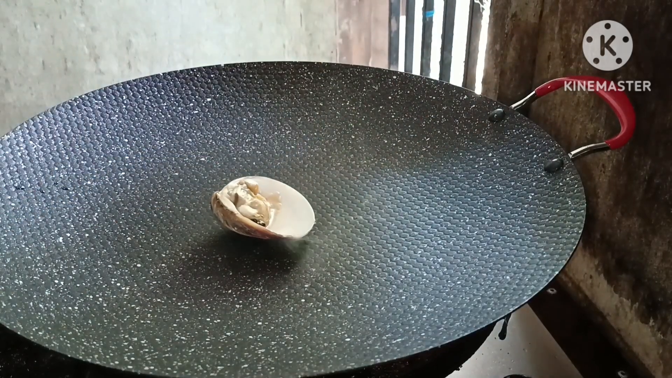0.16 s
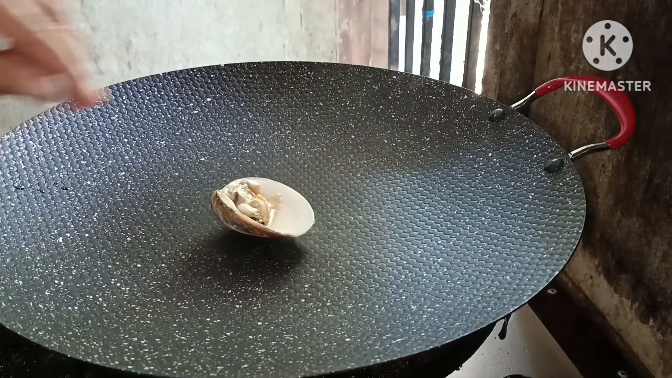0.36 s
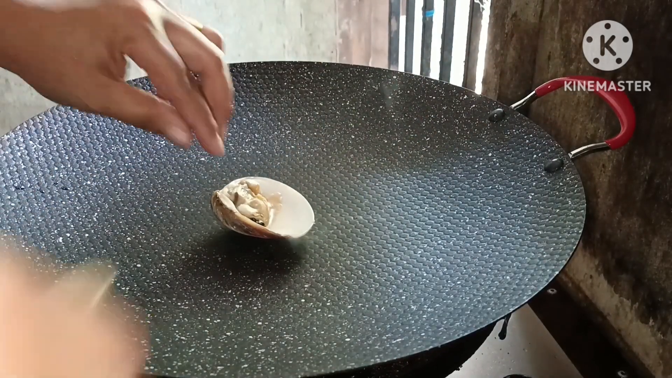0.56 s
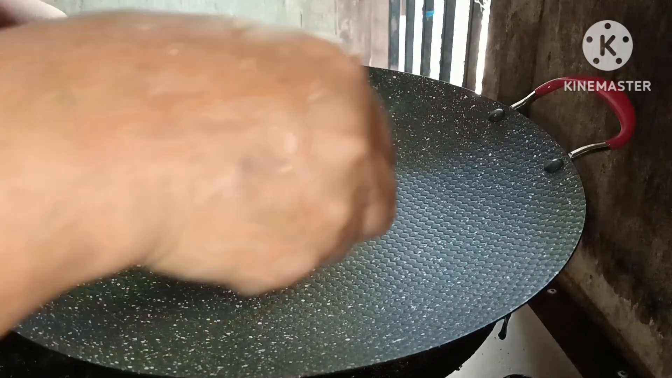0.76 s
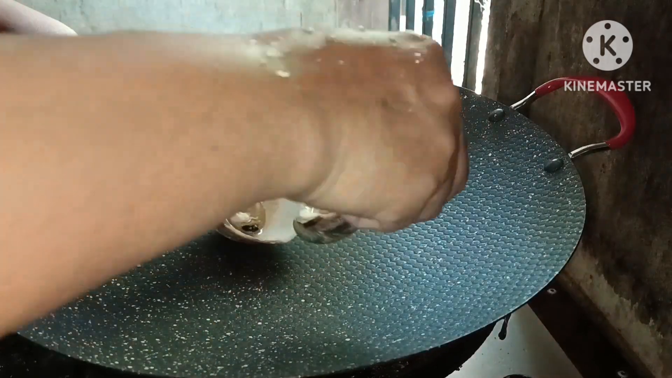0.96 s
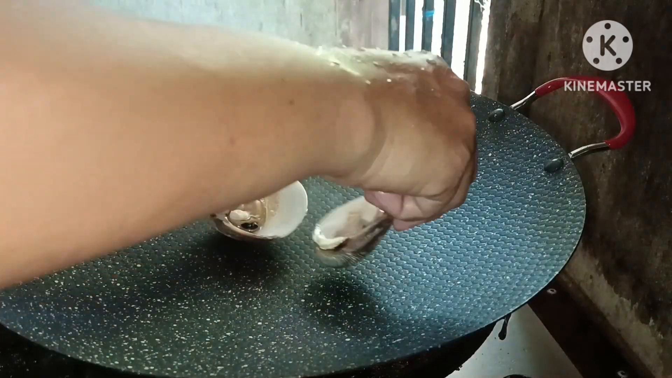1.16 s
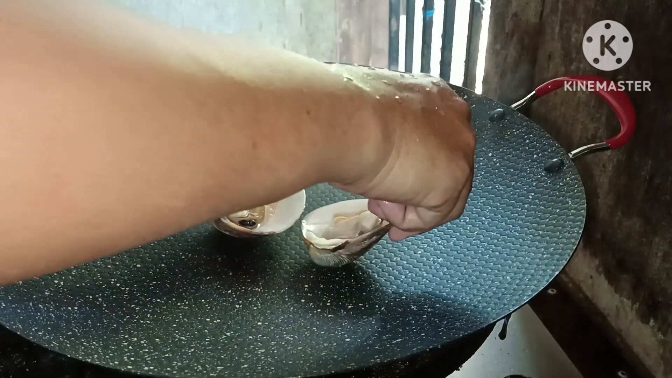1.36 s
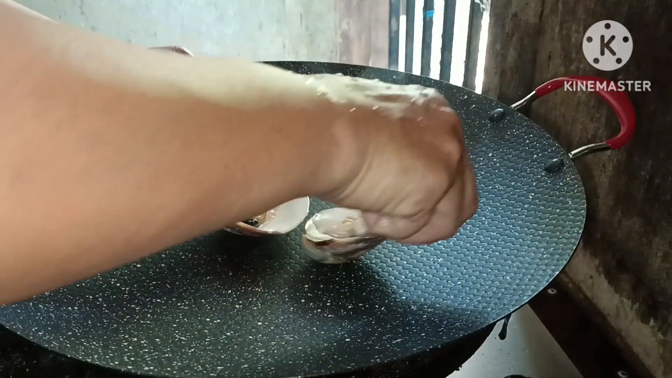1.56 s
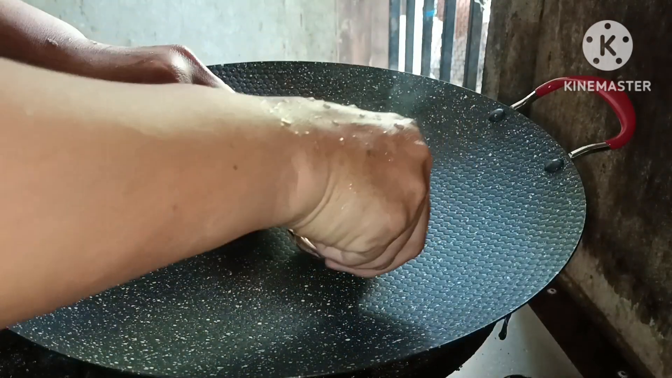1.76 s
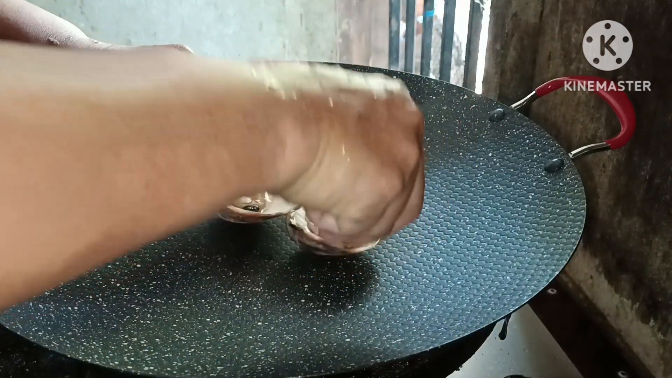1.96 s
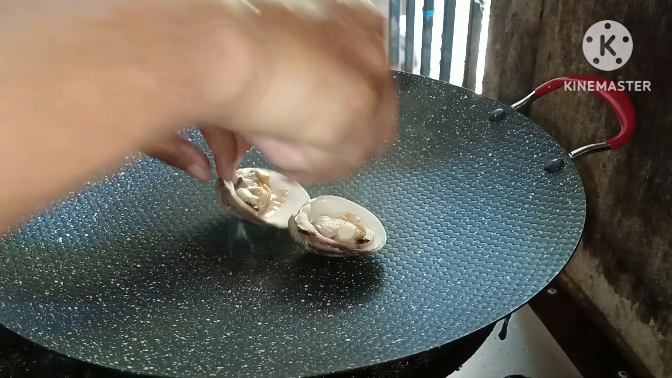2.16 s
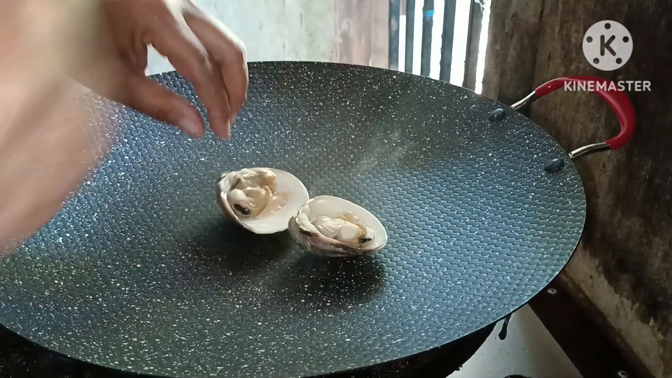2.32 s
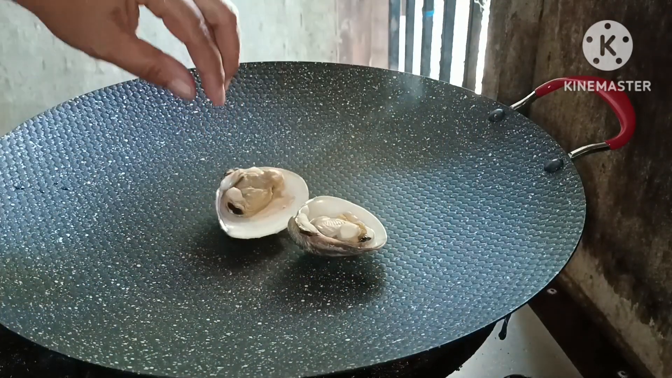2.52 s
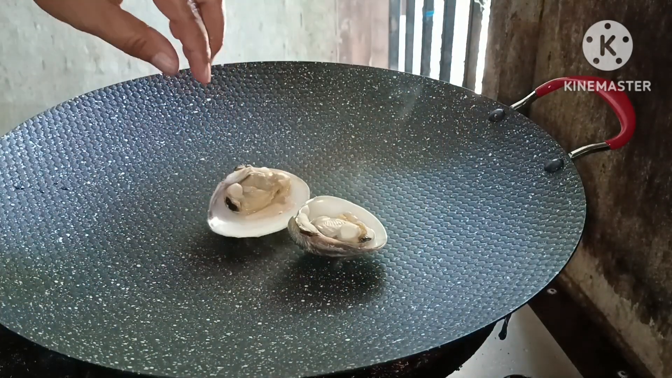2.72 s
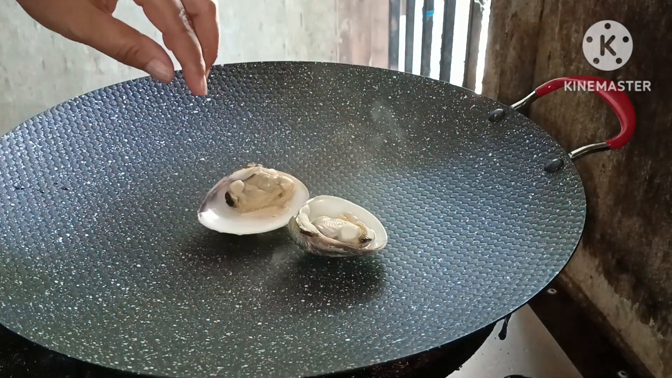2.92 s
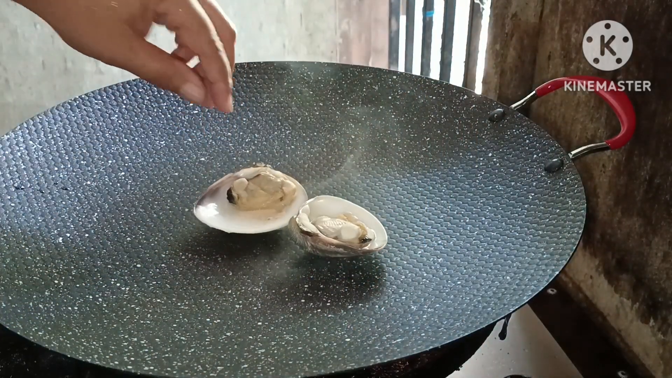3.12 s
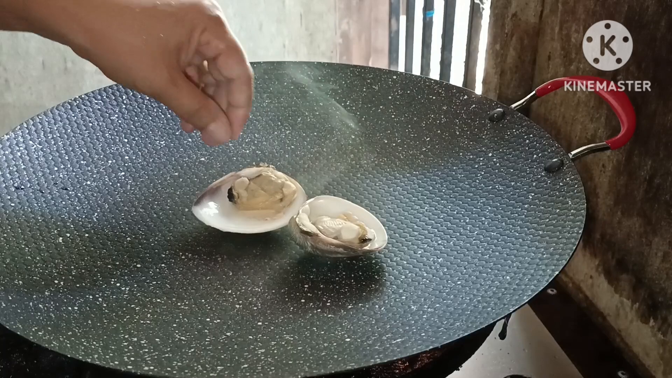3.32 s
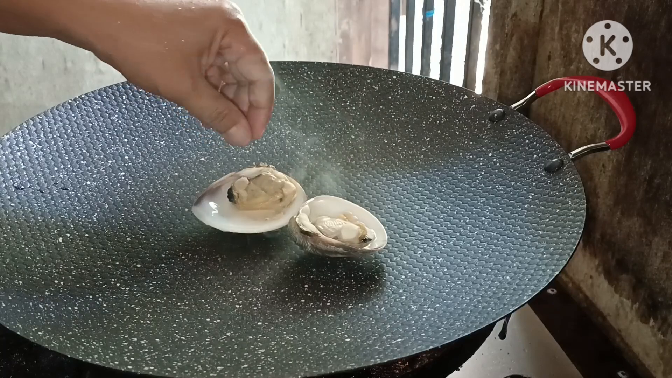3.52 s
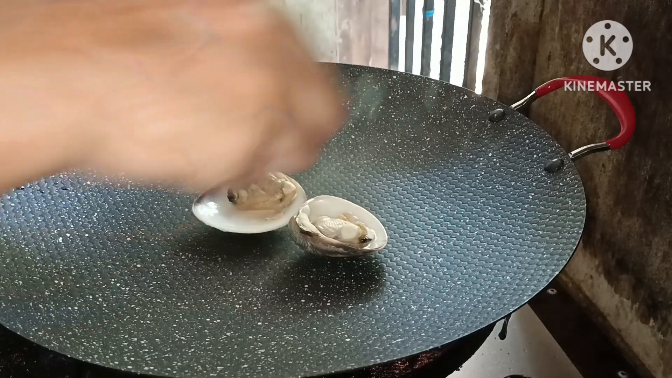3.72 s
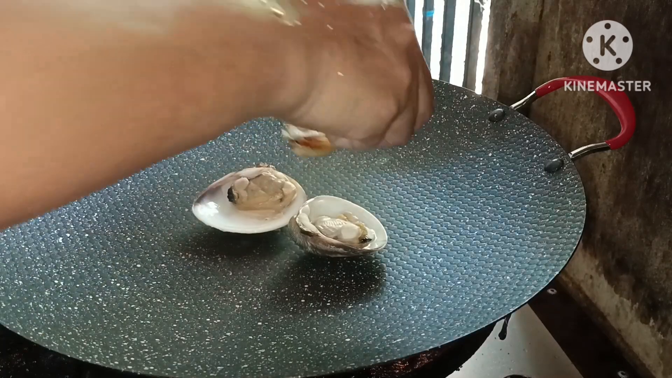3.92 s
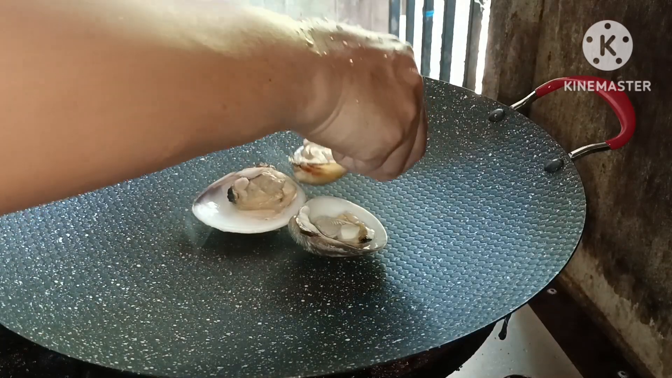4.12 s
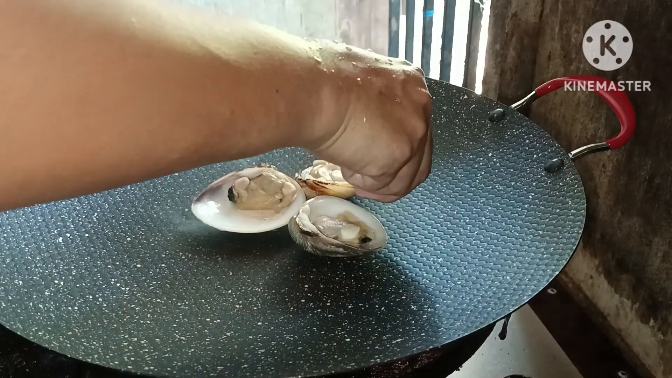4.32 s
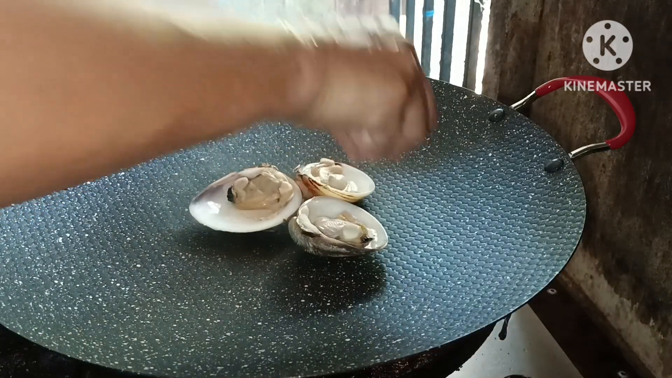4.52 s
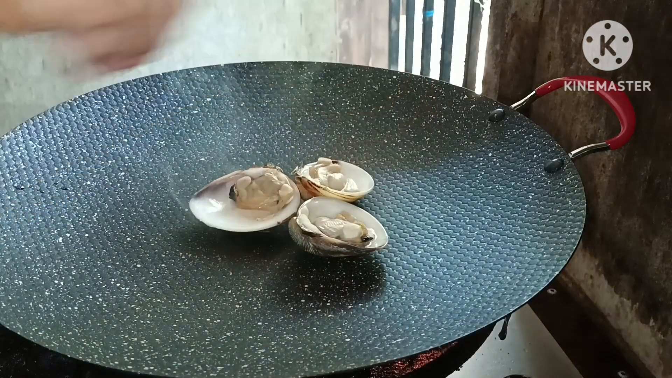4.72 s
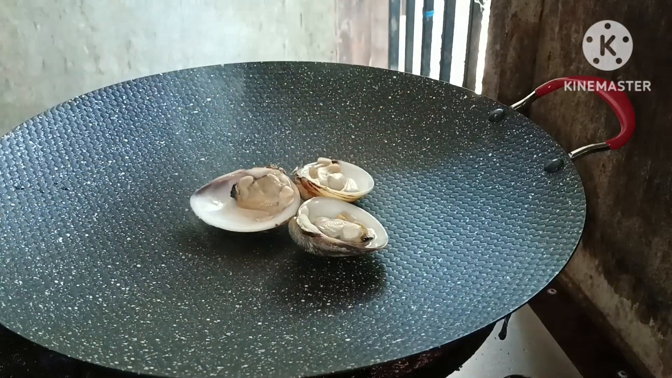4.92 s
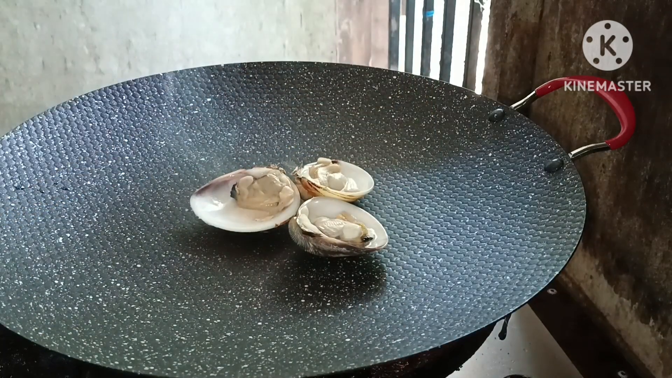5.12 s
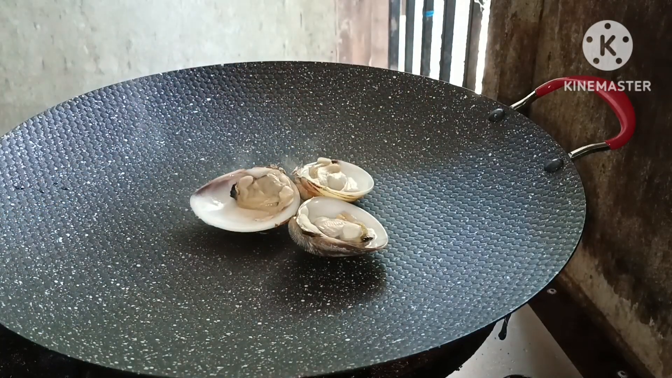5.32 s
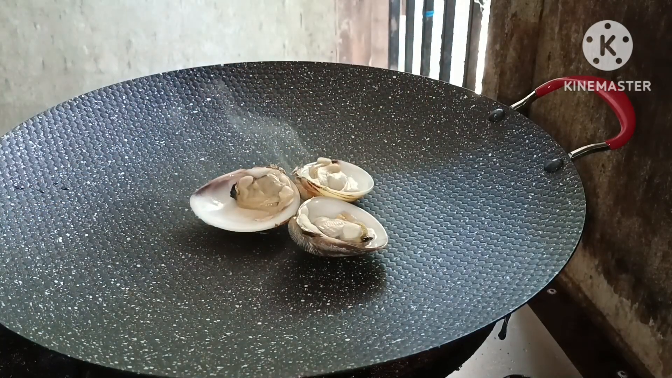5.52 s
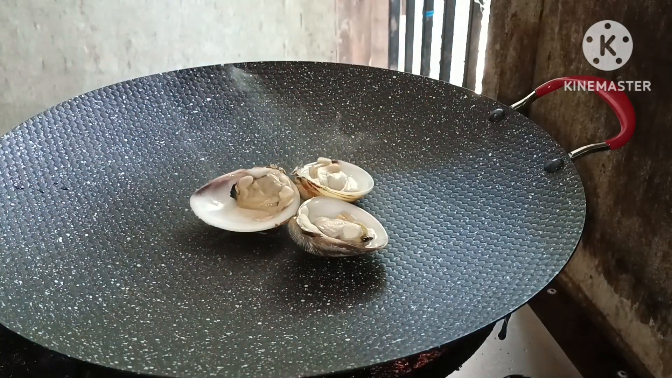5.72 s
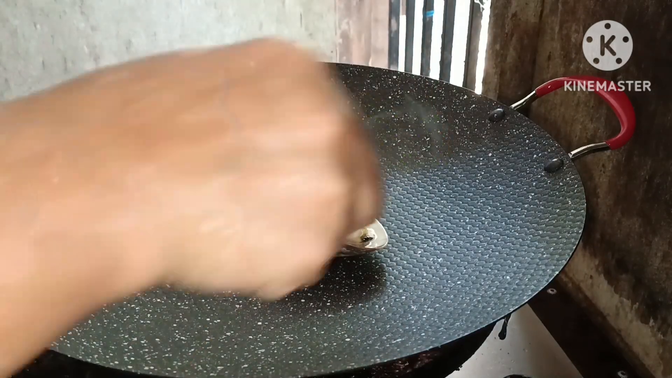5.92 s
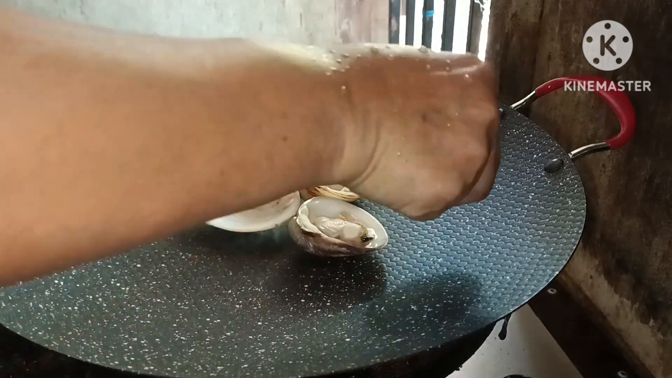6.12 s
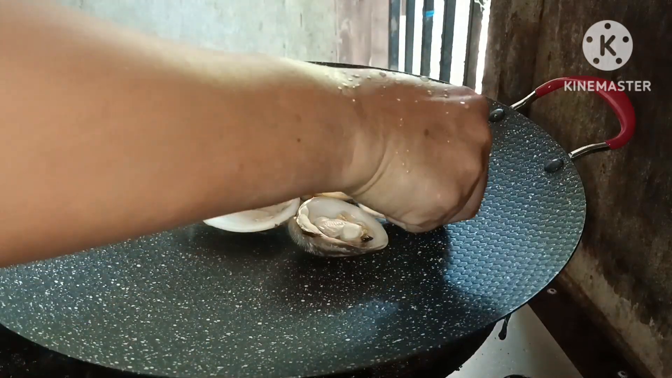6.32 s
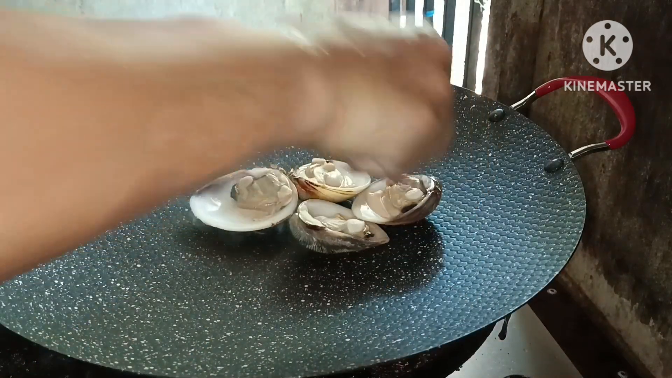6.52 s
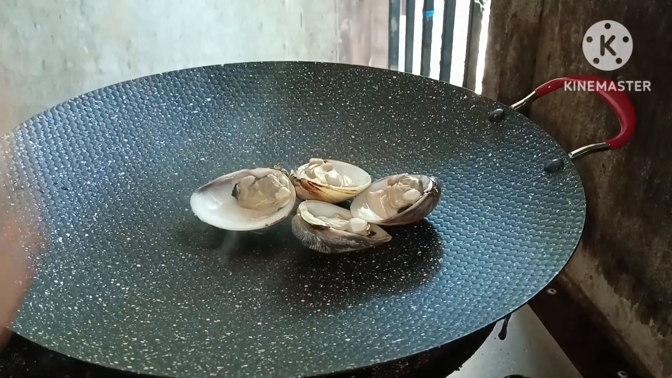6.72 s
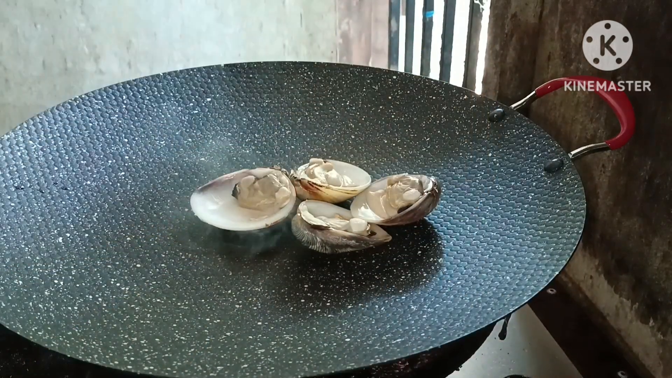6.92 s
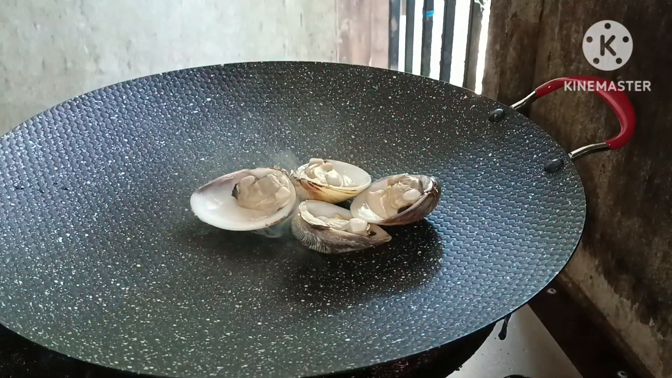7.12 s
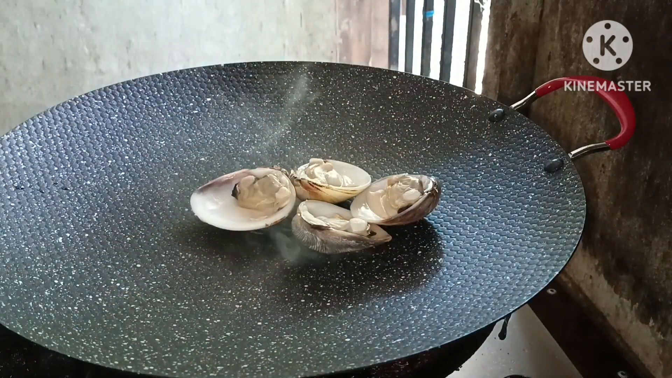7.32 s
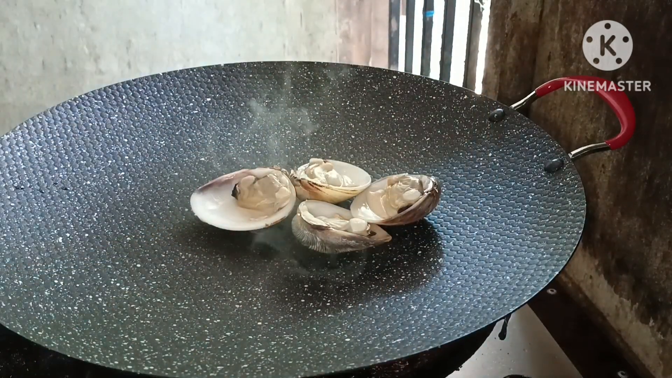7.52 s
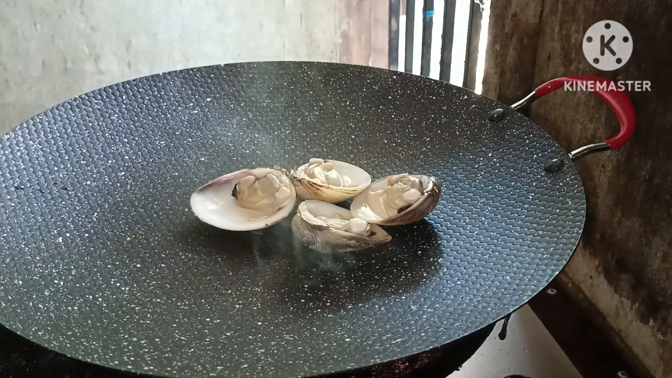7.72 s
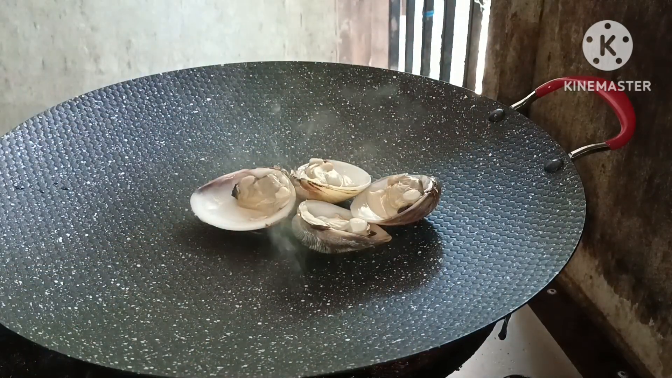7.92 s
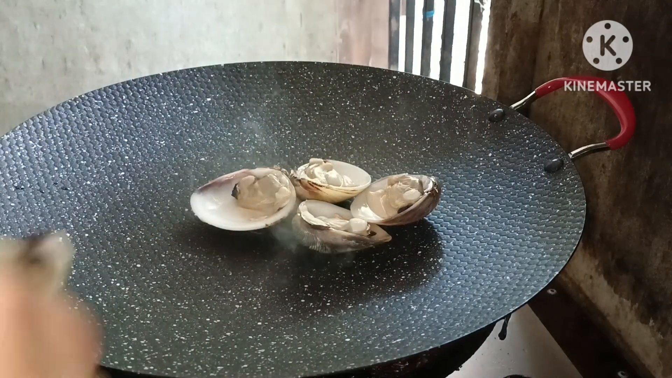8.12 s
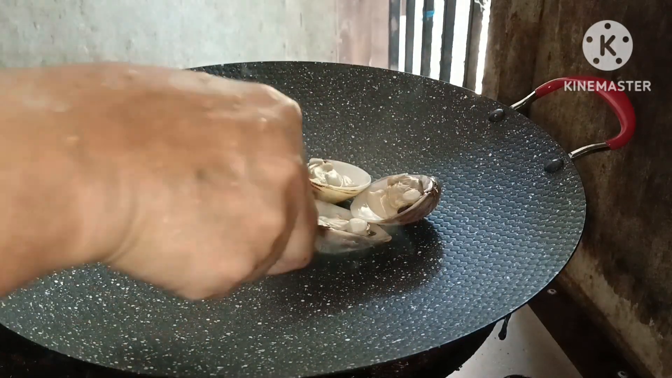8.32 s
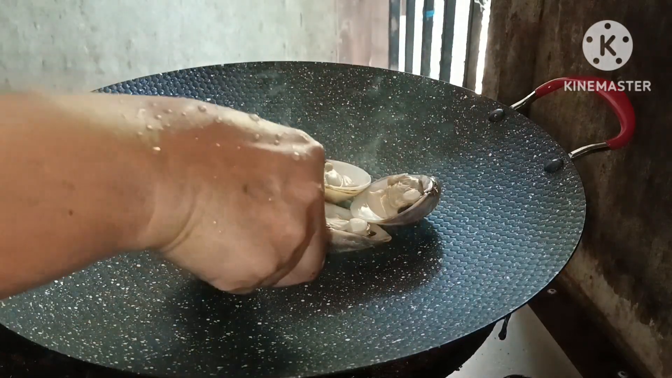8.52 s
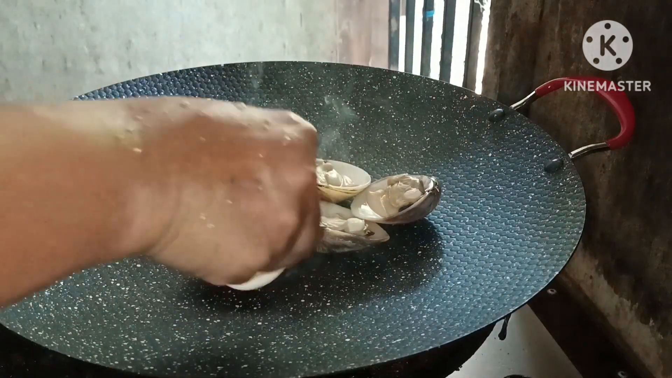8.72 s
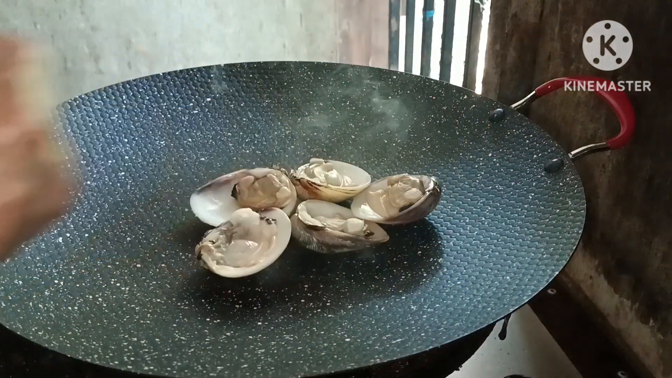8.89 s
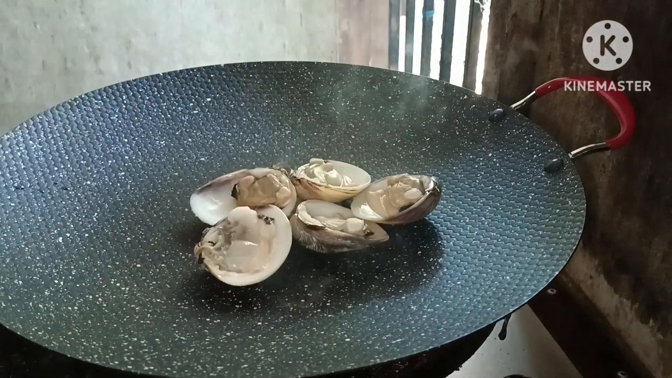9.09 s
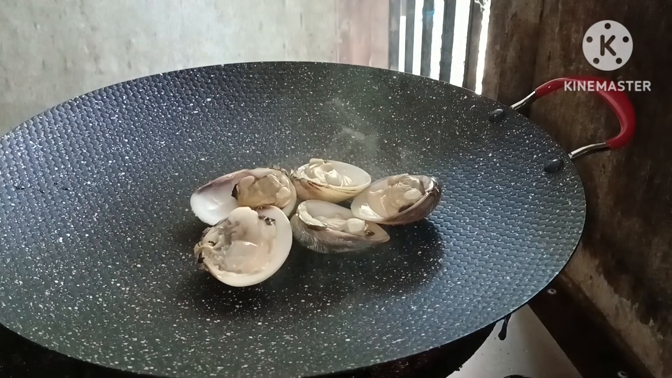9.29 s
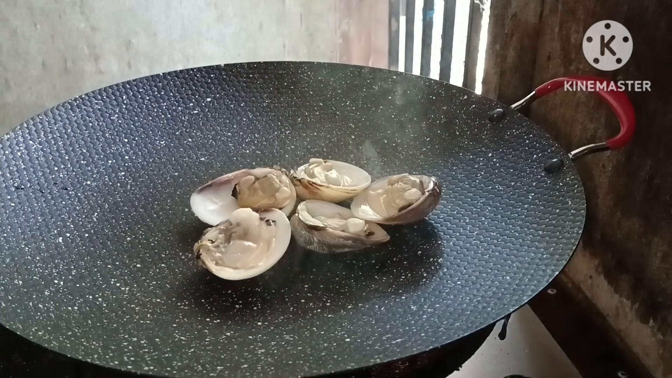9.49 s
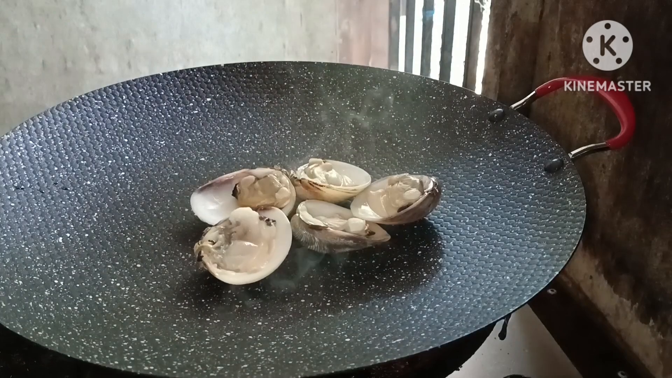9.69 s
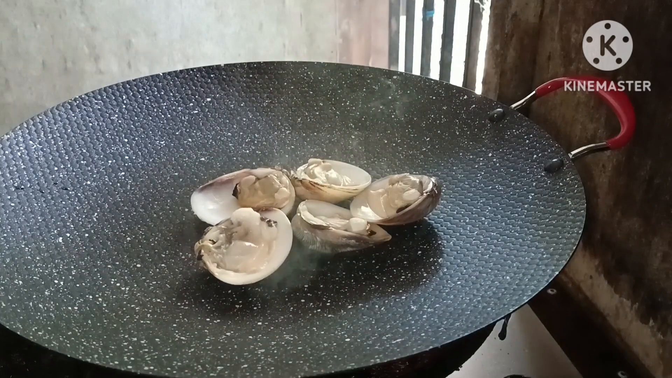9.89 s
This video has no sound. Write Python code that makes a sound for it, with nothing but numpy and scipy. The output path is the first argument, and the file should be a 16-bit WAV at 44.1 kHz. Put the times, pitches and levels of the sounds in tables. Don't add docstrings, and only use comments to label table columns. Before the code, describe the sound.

A close stereo microphone beside a hot pan in a small, lightly echoing room. Shells click together at the start, then four spaced clacks ring the metal, the last three much stronger. Between them come small clinks, scrapes and dull bumps. Fine, high sizzling swells after contacts, bright snaps of bursting juice cluster past the middle, and a brief thin steam squeal follows. Steady low hum, soft draughts and distant traffic rumble lie underneath.

```python
import sys
import numpy as np
from scipy import signal
from scipy.fft import rfft, irfft
from scipy.io import wavfile
from scipy.ndimage import uniform_filter1d

SR = 44100
rng = np.random.default_rng(int(sys.argv[2]) if len(sys.argv) > 2 else 0)


def how_loud(loudness_db):
    steps = np.asarray(loudness_db, float) / 20
    return 10 ** steps


def generate_wav(signal):
    frames = np.transpose(np.atleast_2d(signal))
    scaled = np.clip(frames, -1, 1) * 32767
    pcm = np.round(scaled).astype(np.int16)
    wavfile.write(sys.argv[1], SR, pcm)


N = 438794

# [top t/s, top level/dB, fade/(dB/s)]
FLARES = [(0.22, -41, 300), (0.33, -35, 30), (0.62, -34, 17.5), (0.88, -38.5, 51), (1.48, -27.5, 20.5),
          (1.86, -29.5, 69.5), (2.19, -42, 150), (2.38, -30.5, 65), (2.69, -39, 74), (3.4, -36.5, 7.5),
          (3.57, -38.5, 25), (4.46, -37, 300), (5.65, -53, 200), (6.62, -25.5, 110), (6.7, -35.5, 10.5),
          (6.85, -35, 80), (7.34, -37, 50), (8.2, -41.5, 0.5), (8.76, -32, 37), (9.04, -35.5, 14),
          (9.42, -35, 60), (9.67, -34.5, 20)]
FLARE_RISE_DB_PER_S = 123


def evened(x):
    return x / np.sqrt(np.mean(x ** 2) + 1e-20)


def read(points, hz):
    f, value = np.transpose(points)
    return np.interp(np.log(hz + 1), np.log(f + 1), value)


def curve(rows):
    return np.interp(np.arange(N) / SR, *np.transpose(rows))


def swells(rows, t, rise):
    power = 0
    for top_s, db, fade in rows:
        drop_db = np.where(t < top_s, rise * (top_s - t), fade * (t - top_s))
        power = power + how_loud(2 * (db - drop_db))
    return power


def peaks(table, f):
    return sum(how_loud(2 * db) / (1 + (2 * (f - hz) / width) ** 4) for hz, width, db in table)


def add(mix, s, sound):
    part = mix[:, round(s * SR):][:, :sound.shape[1]]
    part += sound[:, :part.shape[1]]


def sides(db):
    return how_loud(np.array([[db / 2], [-db / 2]]))


def noise(gain, same, count, size):
    frames, hz = 4 * count // size + 5, np.fft.rfftfreq(size, 1 / SR)[:, None]
    a, b, c, d = rng.standard_normal((frames, len(hz), 4)).T
    like = np.clip(same(hz), -1, 1)
    left = a + 1j * b
    right = like * left + np.sqrt(1 - like ** 2) * (c + 1j * d)
    z = np.array([left, right]) * gain(hz, np.arange(frames) * size / 4 / SR)
    return signal.istft(z, nperseg=size, noverlap=3 * size // 4)[1][:, :count]


def mode_bank(hz, t60):
    t = np.arange(SR // 3) / SR
    return np.exp(np.outer(2j * np.pi * hz - np.log(1000) / t60, t))


def pan_modes(count=420):
    pan_hz = [595, 846, 1076, 1184, 1431, 1497, 1690, 1903, 2024, 2080, 2094, 2117, 2319, 2475, 2511, 2548,
              2687, 2784, 2854, 3001, 3235, 3391, 3538, 3642, 3935, 4008, 4121, 4359, 4453, 4897, 2242,
              2390, 2712, 3084, 3140, 3345, 4568, 4985, 5325, 5460, 5660, 5895, 6050, 6785]
    # [f/Hz, level/(dB per Hz)]
    dense_level = [(200, -40), (470, -20.5), (800, -14), (1200, -9), (2100, -13), (3000, -8.5),
                   (4000, -13.5), (5200, -25.5), (6500, -29), (9000, -20), (12000, -19.5), (15500, -24)]
    # [f/Hz, t60/s]
    dense_t60 = [(300, 0.14), (1000, 0.077), (2500, 0.23), (5000, 0.33), (9000, 0.16), (15000, 0.098)]
    share = (np.arange(count) + rng.random(count)) / count
    small_hz = 250 + 15400 * share ** 2
    clear_t60_s = [0.21 if 2050 < f < 2150 else 0.22 for f in pan_hz]
    small_t60_s = read(dense_t60, small_hz) * rng.uniform(.8, 1.2, count)
    hz = np.r_[pan_hz, small_hz]
    bank = mode_bank(hz, np.r_[clear_t60_s, small_t60_s])
    return hz, bank, how_loud(read(dense_level, small_hz)) * np.sqrt(share + 0.064)


def blow(modes, place, db, small_db, rattle_ms, lag):
    # [level/dB at landing places 0, 1, 2, 3]
    pan_ring = [(-28, -20.5, -9, -31), (-48, -14, -31, -50), (-4, -21, -29, -27), (-32, -20, -15, -9.5),
                (-11, -14, -21, -10), (-15, -12, -17, -8), (-16, -6, -20, -5.5), (-24, -10, -37, -24),
                (-27, -13, -24, -16), (-28, 1, -11, -22), (-20, -0.5, 4.5, -5), (-10, -12, -17, -5),
                (-21, -12, -6, -17), (-20, -7, -15, -27), (-28, -18, -13, -12), (-31, -9, -17, -17),
                (-16, -10, -22, -9), (-12, -9, -24, -8), (-28, -12, -30, -7), (-16, -22, -12, 2.5),
                (-13, -20, -16, -4), (-41, -10, -12, -16), (-10, -9, -7.5, -14), (-18, -17, -12, -9),
                (-25, -16, -31, -14), (-25, -9, -27, -29), (-33, -14, -31, -22), (-28, -18, -17, -19),
                (-27, -16, -30, -20), (-23, -21, -25, -16), (-16, -9, -16, -14), (-29, -10, -21, -8),
                (-9, -15, -24, -6), (-26, -22, -7, -22), (-26, -19, -24, -11), (-27, -18, -19, -13),
                (-31, -22, -15, -13), (-36, -29, -23, -36), (-34, -22, -23, -23), (-36, -23, -26, -25),
                (-40, -40, -42, -29), (-33, -38, -28, -25), (-32, -26, -34, -27), (-34, -26, -23, -27)]
    # [f/Hz, level/dB at places 0, 1, 2, 3]
    place_colour = [(605, 4, -4, 5, -1), (1000, -5, -2, -3, -1), (1500, 0, 1.5, 0, 1.8),
                    (2300, 1, 3, 1, 1.5), (3100, 2, 0, -2, 1.5), (3850, -1.5, -0.5, -3, -2),
                    (4500, -3, 2.5, -3, 0.5), (5500, -3, 0.1, -5, 0.1), (8100, 2, -0.5, -3.5, 0.1),
                    (13000, 0.1, -0.5, -1.5, 1.5)]
    hz, bank, small = modes
    level = how_loud(np.array(pan_ring)[:, place])
    count, t = len(level), np.arange(bank.shape[1]) / SR

    start, scatter = rng.random(len(hz)), rng.standard_normal(len(hz))
    spread_rad = np.where(np.arange(len(hz)) < count, .4, 1.11)
    delay_rad = 2 * np.pi * hz * lag / SR + spread_rad * scatter
    turn = np.exp(2j * np.pi * start - 1j * np.outer([1, 0], delay_rad))

    clear = ((level / np.linalg.norm(level) * turn[:, :count]) @ bank[:count]).imag
    clear *= how_loud(220 * np.minimum(t, rattle_ms / 1000))

    small_hz = hz[count:]
    octaves_up = np.log2(np.maximum(small_hz / 3500, 1))
    small = small * how_loud(0.2 * (db + 5.0) * octaves_up)
    small = small * how_loud(read(np.array(place_colour)[:, [0, place + 1]], small_hz))
    dense = ((small / np.linalg.norm(small) * turn[:, count:]) @ bank[count:]).imag

    rattling = t < max(rattle_ms, 2) / 1000
    contacts = rng.standard_normal(len(t)) * rattling * (rng.random(len(t)) < 3000 / SR)
    contacts = 0.76 * contacts / np.linalg.norm(contacts) + (t == 0)
    dense = signal.oaconvolve(dense, contacts[None, :SR // 10], axes=1)[:, :len(t)]
    return how_loud(db) * (clear + how_loud(small_db) * dense) * np.minimum(t / .001, 1)


def tick(db, note_hz, treble_db, pan_db):
    # [f/Hz, level/(dB per Hz)]
    tick_colour = [(470, -58), (800, -35), (1930, -9), (2330, -4), (3080, -2), (3710, 4), (6050, -1.5),
                   (7190, -11), (11900, -5), (15000, -10)]
    t = np.arange(SR // 16) / SR
    hz = np.fft.rfftfreq(len(t), 1 / SR)
    treble = treble_db * np.clip(np.log2(hz / 3600 + 1e-3), 0, 1)
    colour = how_loud(read(tick_colour, hz) + treble)
    crack = evened(irfft(rfft(rng.standard_normal((2, len(t)))) * colour, len(t)))
    crack_fade = how_loud(-60 * t / .01) + .18 * how_loud(-60 * t / .05)
    note = np.sin(2 * np.pi * (note_hz * t + rng.random((2, 1))))
    note = how_loud(-6) * note * how_loud(-60 * t / 0.016)
    one = (crack * crack_fade + note) * np.minimum(t / .0002, 1)
    rebound = np.pad(one, ((0, 0), (110, 0)))[:, :len(t)]
    return how_loud(db + 1.5) * sides(pan_db) * (one + 0.31 * rebound)


def bump(db, hz, t60):
    t = np.arange(SR // 2) / SR
    phase = 2 * np.pi * rng.random((2, 2, 1)) * min(hz / 2500, 1)
    pair = np.sin(2 * np.pi * hz * t + phase[0]) + 0.58 * np.sin(2 * np.pi * 1.04 * hz * t + phase[1])
    return how_loud(db - 3 - 60 * t / t60) * pair * np.minimum(t * hz / 4, 1)


def pop(db, hz, pan_db):
    t = np.arange(SR // 40) / SR
    snap = np.sin(2 * np.pi * hz * t) * how_loud(-60 * t / 0.0022) * np.minimum(t / .0001, 1)
    spray = rng.standard_normal((2, len(t))) * how_loud(-7.5 - 60 * t / 0.011)
    spray_band = signal.butter(3, [7500, 14500], "bandpass", fs=SR, output="sos")
    spray = signal.sosfilt(spray_band, spray)
    return how_loud(db - 2.0) * sides(np.clip(pan_db, -12, 12)) * (snap + spray)


def sizzle():
    # [f/Hz, level/(dB per Hz)]
    sizzle_colour = [(2350, -35), (4140, -20.5), (5870, -14), (6820, -17.5), (8400, -7), (9300, -2.5),
                     (9700, 0), (10700, -2.5), (11700, 0), (12700, -3), (14500, -3.5), (15500, -3.5)]
    # [f/Hz, left-right/dB]
    sizzle_side = [(60, -10.5), (180, -7), (550, -6), (1650, -11.5), (4970, -7.5), (15000, -0.5)]
    # [t/s, level/dB]
    simmer = [(0, -37), (0.5, -39.5), (1.39, -40.5), (2.0, -48), (2.8, -44.5), (2.95, -42.5), (3.25, -41),
              (4.13, -36), (4.19, -43), (4.45, -42), (4.55, -47), (5.4, -49), (5.8, -45.5), (6.33, -49),
              (6.5, -38.5), (7.65, -41.5), (8.55, -41), (9.95, -35)]
    frames = N // 64 + 5
    flicker = evened(uniform_filter1d(rng.standard_normal(frames), 6))
    patches = rng.standard_normal((frames, 129)).T
    patches = evened(uniform_filter1d(uniform_filter1d(patches, 5, 0), 50, 1))

    def colour(f, u):
        side_db = read(sizzle_side, f) * np.array([.5, -.5])[:, None, None]
        return how_loud(read(sizzle_colour, f) + 1.4 * patches + 1.0 * flicker + side_db)

    hiss = evened(noise(colour, lambda f: 0.047 + 0 * f, N, size=256))
    bursts = how_loud(2.95 * np.minimum(rng.exponential(1, N), 4)) * (rng.random(N) < 300 / SR)
    grain = signal.oaconvolve(bursts, how_loud(-60 * np.arange(400) / SR / 0.0052))[:N]
    boil = how_loud(2 * curve(simmer)) + swells(FLARES, np.arange(N) / SR, FLARE_RISE_DB_PER_S)
    return np.sqrt(boil) * evened(hiss * (1 + 0.15 * grain))


def air():
    # [t/s, level/dB]
    steam_level = [(0, -66), (0.5, -62.5), (2.0, -56.5), (3.5, -58), (4.5, -56), (6.2, -58), (6.7, -49.5),
                   (9.95, -49)]
    # [f/Hz, level/(dB per Hz)]
    steam_colour = [(1200, -36), (2000, -12), (2900, -5), (4000, -1.5), (5500, -6.5), (7500, -7),
                    (9000, -26.5)]
    # [top t/s, top level/dB, fade/(dB/s)]
    puffs = [(0.27, -49, 61), (0.34, -50, 120), (3.37, -51, 120), (5.55, -56, 13), (5.73, -56, 200),
             (7.62, -48.5, 24), (9.94, -50, 20)]
    # [t/s, level/dB]
    squeal_level = [
        (7.40, -82),
        (7.48, -45),
        (7.76, -54),
        (7.82, -64),
        (8.2, -67),
        (8.4, -80),
    ]
    # [f/Hz, width/Hz, level/dB]
    squeal_peaks = [(2880, 130, 0), (3850, 71, -1), (4680, 200, -8)]
    # [top t/s, top level/dB]
    draught_tops = [(0.33, -53), (0.97, -57), (3.0, -57), (3.35, -49.5), (3.93, -52), (4.41, -52),
                    (5.82, -50), (5.5, -54), (6.9, -50.5), (7.57, -50), (8.23, -53.5), (8.76, -53.5)]
    # [f/Hz, level/(dB per Hz)]
    rumble_colour = [(15, -19), (30, -2), (55, 11), (80, 2.5), (150, 1), (250, -8), (350, -8.5), (500, -48)]
    # [f/Hz, level/(dB per Hz)]
    air_colour = [(100, -47), (300, -21.5), (600, -24), (1000, -22.5), (1700, -25), (2600, -23),
                  (4500, -34.5), (7000, -46), (10000, -32), (16000, -35)]
    # [f/Hz, width/Hz, level/dB]
    hollows = [(416, 48, -9.5), (480.2, 29, -4), (794.7, 72, -9.5), (1176, 95, -19)]
    # [f/Hz, correlation]
    same = [(60, 0.65), (110, 0.81), (200, 0.92), (380, 0.28), (700, -0.38), (1290, -0.53), (2380, -0.16),
            (4400, -0.24), (8120, -0.65), (15000, 0.86)]
    traffic_db, draught_db_per_s, steam_under_flare_db, air_db = -57, 29.5, -19, -46.5
    patches = rng.standard_normal((N // 512 + 5, 1025)).T
    patches = evened(uniform_filter1d(uniform_filter1d(patches, 16, 0), 8, 1))

    def layer(power, level_db):
        return power / np.mean(power) * how_loud(2 * level_db)

    def colour(f, u):
        def at(rows):
            return np.interp(u, *np.transpose(rows))

        draughts = swells([(s, db, draught_db_per_s) for s, db in draught_tops], u, draught_db_per_s)
        flares = how_loud(2 * steam_under_flare_db) * swells(FLARES, u, FLARE_RISE_DB_PER_S)
        steam = how_loud(2 * at(steam_level)) + flares + swells(puffs, u, 60)
        power = layer(how_loud(2 * read(air_colour, f)) + peaks(hollows, f), air_db - 1.5)
        power = power + layer(how_loud(2 * read(rumble_colour, f)), 4.07) * (how_loud(2 * traffic_db) + draughts)
        power = power + layer(how_loud(2 * read(steam_colour, f)), 0) * steam
        power = power + layer(peaks(squeal_peaks, f), at(squeal_level))
        return np.sqrt(power) * how_loud(1.0 * patches)

    white = noise(lambda f, u: 1, lambda f: 0 * f, SR, size=2048).std()
    return noise(colour, lambda f: read(same, f), N, size=2048) / white


def hum():
    # [t/s, level/dB]
    hum_level = [(0.0, -39), (4.16, -37.5), (4.68, -39.5), (6.46, -37), (6.6, -38), (9.12, -40.5),
                 (9.95, -38.5)]
    knots = np.arange(0, N + 9000, 9000)
    wander = evened(np.interp(np.arange(N), knots, rng.standard_normal(len(knots))))
    hz = 100.3 + .15 * wander
    return np.sqrt(2) * how_loud(curve(hum_level)) * np.sin(2 * np.pi * np.cumsum(hz) / SR)


def kitchen(x):
    # [f/Hz, t60/s]
    kitchen_t60 = [(200, 0.28), (1000, 0.34), (4000, 0.26), (12000, 0.29)]
    taps = np.zeros((2, SR // 2))
    slots = np.arange(200, SR // 2 - 20, 20)
    at = slots + rng.integers(0, 20, (2, len(slots)))
    np.put_along_axis(taps, at, rng.choice([-1., 1.], at.shape), 1)
    hz, t, z = signal.stft(taps, SR, nperseg=256)
    fade = how_loud(-60 * t / read(kitchen_t60, hz)[:, None])
    tail = signal.istft(z * fade, SR, nperseg=256)[1]
    return signal.fftconvolve(x, tail / np.linalg.norm(tail[0]), axes=1)[:, :N]


def scene():
    # [t/s, strength/dB, small modes/dB, rattle/ms, left lag/samples]
    blows = [(1.434, -20.5, -5, 4.4, -6.5), (4.440, -9.5, -1, 34, 16.5), (6.466, -9.5, -1.5, 17, -16),
             (8.7335, -10.5, 0, 14, -15.5), (1, -54, -4, 6, 10), (1.79, -42.5, -3.5, 6.9, -4.5),
             (2.244, -48, -10, 3.3, -7), (2.299, -48, -7, 3, -10), (8.8, -47, -11, 4.8, -7),
             (4.606, -38, -6, 4, 17), (4.532, -32.5, 0, 3.3, 10.5), (4.461, -21.5, 7, 22, 16.5),
             (8.792, -29.5, 0.5, 3.5, -13.5), (8.815, -32.5, 0.5, 3, -14), (6.48, -24.5, 3, 3, -13.5)]
    places = [0, 1, 2, 3, 1, 2, 0, 0, 3, 1, 1, 1, 3, 3, 2]
    # [t/s, peak/dB, shell note f/Hz, treble/dB, left-right/dB]
    ticks = [(0.1482, -17.5, 5970, -1, -8.5), (0.2135, -21, 3840, 4, -8), (0.2493, -8.5, 3840, 2, -6),
             (0.3175, -28, 2140, -1, 5), (0.3564, -26.5, 3360, 1, -5), (3.3247, -38, 5100, 6, -3),
             (3.3548, -34, 5100, -2, -4), (3.3811, -33, 5100, -1, -6), (5.4484, -29.5, 3080, -5, 8),
             (5.7134, -34, 4100, -5, -2), (5.7238, -29.5, 4400, 0, -9), (3.668, -38, 3880, 3, -4),
             (5.653, -43, 5600, 8, -5)]
    # [t/s, peak/dB, centre f/Hz, left-right/dB]
    pops = [(2.1904, -40, 12400, 16), (2.456, -11.5, 10500, 3), (4.729, -39, 9630, 3),
            (5.0374, -37, 10000, -26), (5.653, -17.5, 11600, -14), (5.7927, -38.5, 10900, -11.5),
            (6.6034, -14, 8700, 4), (6.6274, -17, 9600, -5), (6.6684, -10, 11530, -8),
            (6.7095, -9, 11500, -10), (6.8353, -17, 11700, -26), (6.9935, -16, 11400, -13),
            (7.325, -14.5, 10800, -19), (7.4044, -13, 12400, -19), (8.1189, -24, 8670, -14)]
    # [t/s, peak/dB, f/Hz, t60/s]
    bumps = [(0.258, -43, 236, .2), (3.8, -46, 192, 0.22), (3.1, -41, 220, 0.28), (5.70, -27.5, 147, 0.14),
             (5.73, -29.5, 326, 0.086), (5.76, -33, 237, 0.22), (7.1, -42, 230, 0.09),
             (5.534, -33, 2050, 0.07), (5.534, -38, 3900, .05), (1.435, -33, 1077, 0.29),
             (4.442, -13, 1085, 0.11), (5.655, -44, 5500, .01), (5.607, -32.5, 2100, 0.066),
             (4.445, -31.5, 243, 0.16), (8.74, -34, 260, 0.25), (1.436, -43, 250, 0.14),
             (4.441, -15, 820, 0.09), (4.441, -17, 1500, 0.11), (6.467, -23.5, 480, 0.11),
             (4.8, -33, 1480, 0.024), (8.858, -26, 1190, 0.046), (2.245, -42, 2100, 0.27),
             (2, -48, 2300, .1)]
    # [t/s, peak/dB, f/Hz, t60/s]
    further_bumps = [(0.223, -36, 2900, .03), (0.2545, -25, 2300, .04), (0.271, -32, 5200, .04),
                     (0.3, -38, 2200, .1), (0.322, -32, 2100, 0.08), (0.3175, -31, 4500, .04),
                     (0.356, -33, 4300, .06), (1.02, -42, 850, .1), (1.424, -38, 3100, .06),
                     (1.79, -43, 2100, .13), (1.79, -40, 1150, .1), (1.79, -37, 520, .12), (1.85, -41, 2150, .08),
                     (2.243, -36, 1170, .1), (2.3, -39, 1200, 0.11), (2.3, -41, 1500, 0.13),
                     (3.326, -35.5, 5200, .09), (3.338, -38, 5300, .08), (3.355, -35, 2750, 0.055),
                     (3.356, -31, 5200, 0.051), (3.382, -30.5, 3800, .04), (3.384, -37, 2200, .05),
                     (3.384, -33, 5100, 0.055), (5.4535, -30, 3300, .03), (5.462, -38, 3200, .06),
                     (5.449, -28, 2300, 0.033), (5.545, -34, 3850, .05), (5.7135, -33, 4300, .07),
                     (5.716, -38, 6800, .08), (1.492, -36, 2760, .09), (1.462, -36, 3000, .08),
                     (0.2135, -32, 5000, .03), (0.2135, -31, 2900, .03), (0.285, -37, 4000, .06),
                     (0.262, -33, 3600, .05), (0.33, -38, 3500, .06), (3.39, -38, 3900, .05),
                     (8.773, -28, 6100, .05), (8.811, -31, 4500, .05)]
    pan, small, modes = np.zeros((2, N)), np.zeros((2, N)), pan_modes()
    for place, (s, *row) in zip(places, blows):
        add(pan, s, blow(modes, place, *row))
    for table, source in ((ticks, tick), (pops, pop), (bumps, bump), (further_bumps, bump)):
        for s, *row in table:
            add(small, s, source(*row))
    echo = kitchen(how_loud(-9.5) * pan + how_loud(-8.0) * small)
    return pan + small + echo + sizzle() + air() + hum()


def top_cut(x):
    return signal.sosfilt(signal.butter(12, 16820, fs=SR, output="sos"), x)


def record(dry):
    peak_db = 20 * np.log10(abs(dry).max(0) + 1e-9)
    fall_db = np.arange(N) * 120.0 / SR
    held_peak_db = np.maximum.accumulate(peak_db + fall_db) - fall_db
    over_db = np.maximum(held_peak_db + 2.5, 0)
    held = dry / how_loud(.85 * uniform_filter1d(over_db, 40))
    return top_cut(0.99 * np.tanh(held / 0.82))


dry = scene()
out = record(dry)
generate_wav(out)
```